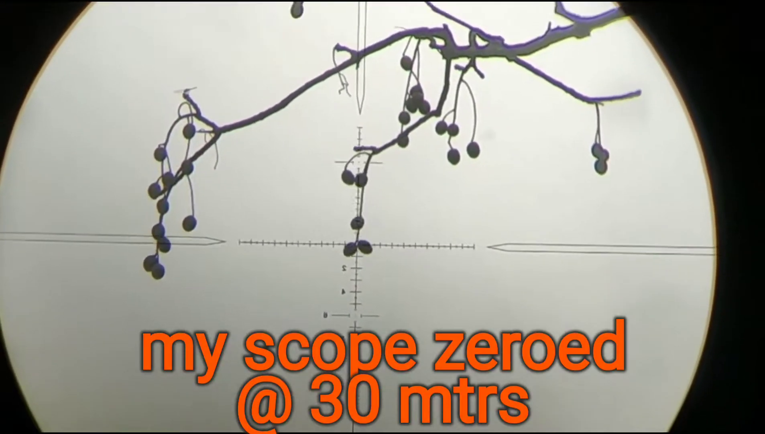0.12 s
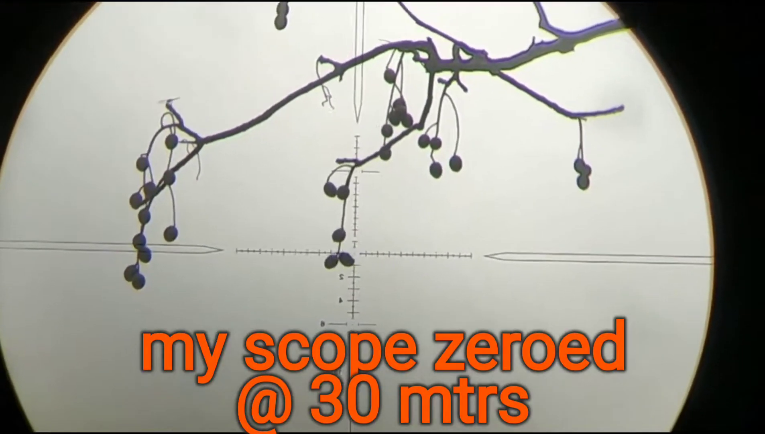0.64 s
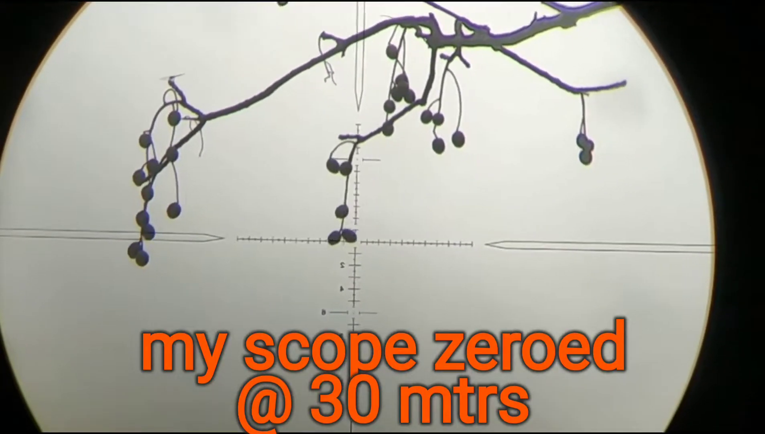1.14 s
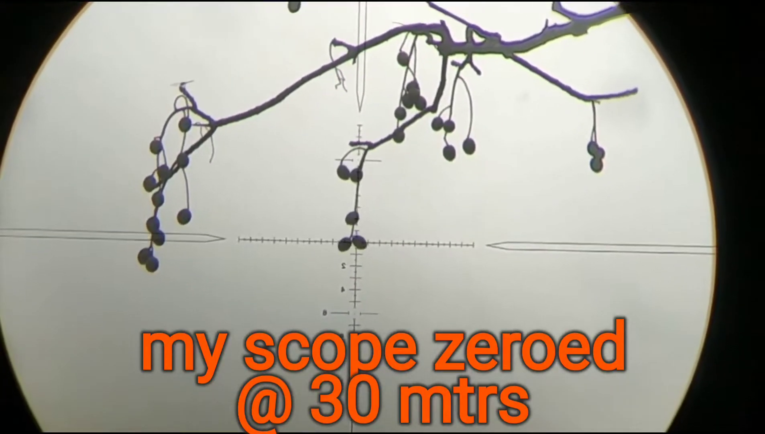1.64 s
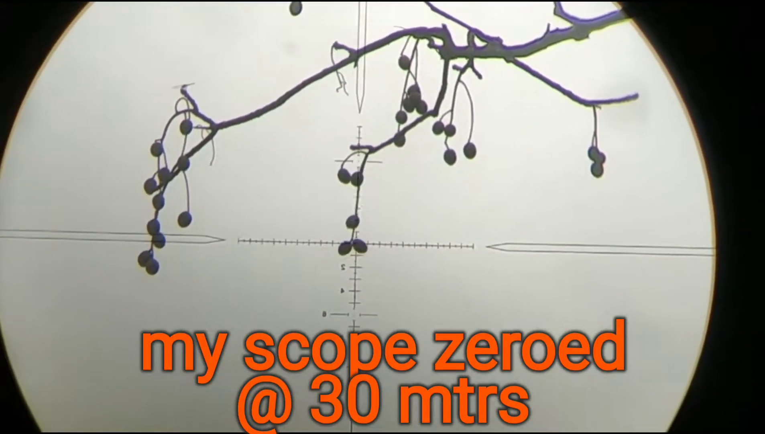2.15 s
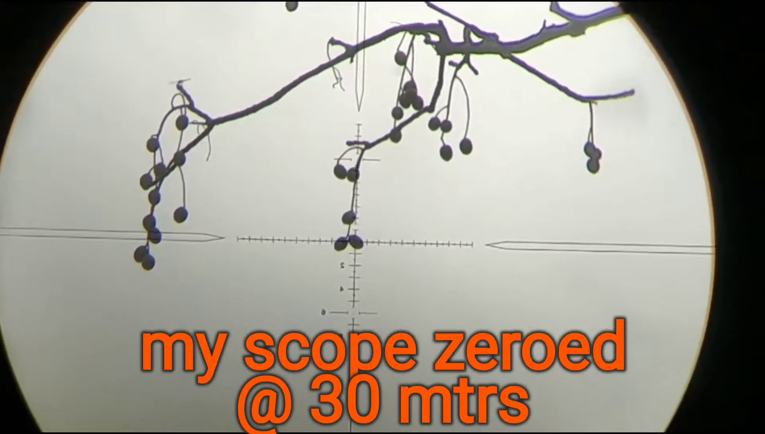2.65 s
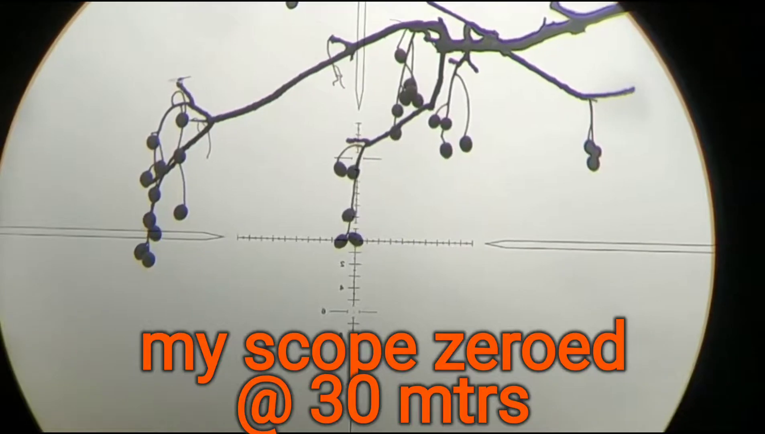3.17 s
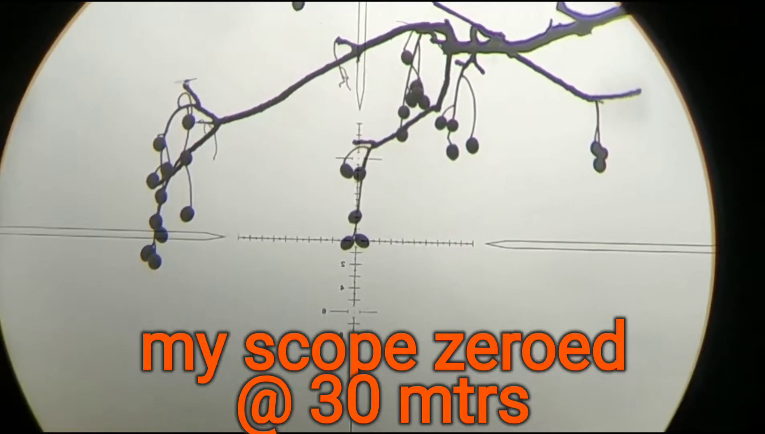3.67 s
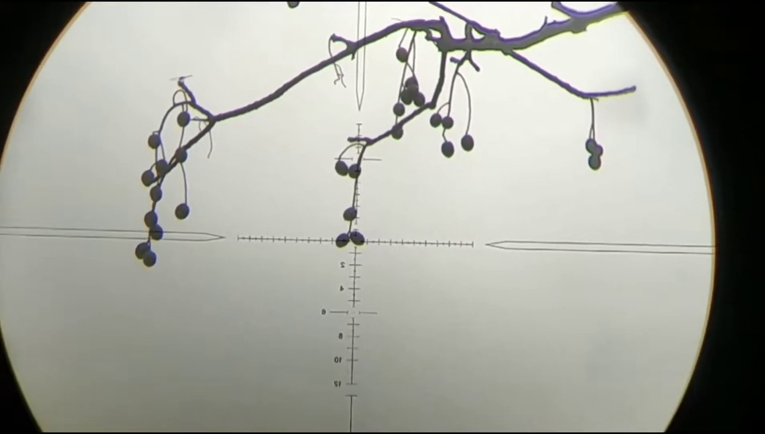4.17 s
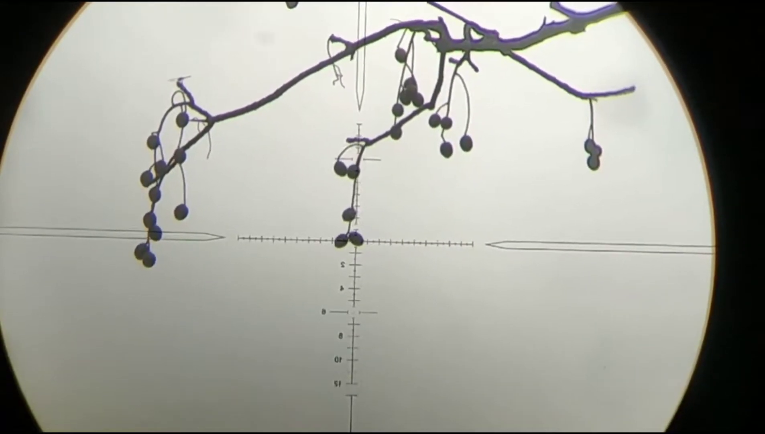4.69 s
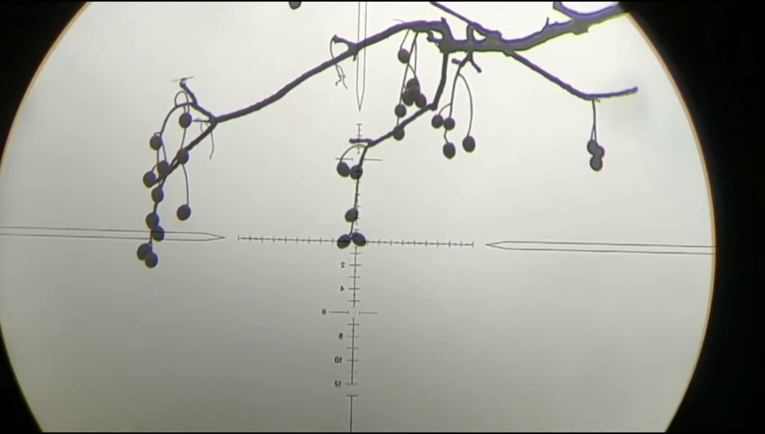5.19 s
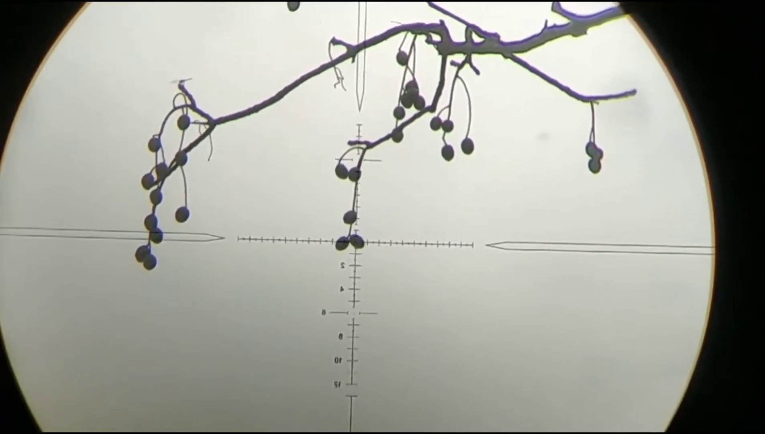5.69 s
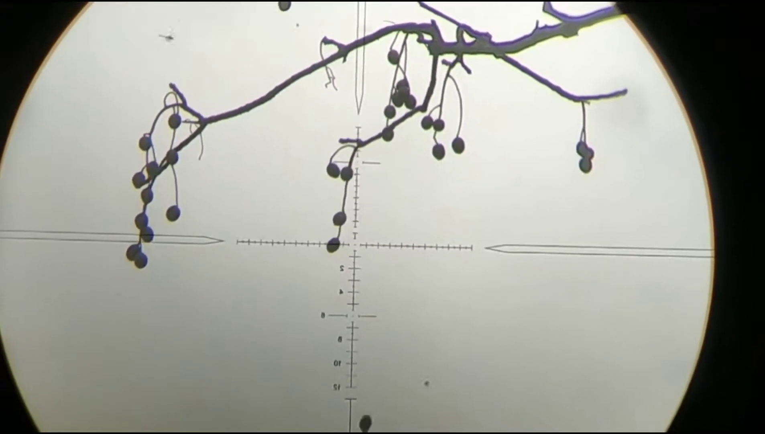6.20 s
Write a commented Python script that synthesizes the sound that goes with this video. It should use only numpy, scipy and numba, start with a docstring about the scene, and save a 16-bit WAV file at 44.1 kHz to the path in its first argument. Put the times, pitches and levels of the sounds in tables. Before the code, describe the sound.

Far-off engine putters, swells and fades in quiet open air; a low rumble cuts in, an air rifle snaps, and a twig cracks moments later.

```python
"""Outdoors: a distant single-cylinder engine, pulses and gas through a pipe, thumps up and away over a thin
hiss of air, which is coloured noise above dull far traffic; a short scratch of noise brushes once.
A centred rumble of noise and hums cuts in abruptly, then an air rifle fires just right of a two-port
microphone: damped clacks and thuds, noise for escaping air, ringing steel modes that it shakes.
A moment later the pellet cracks into a twig, and splinters and grainy echoes from the trees follow."""
import sys
import numpy as np
from scipy import signal
from scipy.fft import rfft, irfft
from scipy.io import wavfile
from scipy.ndimage import uniform_filter1d
from numba import njit

SR = 44100
rng = np.random.default_rng(int(sys.argv[2]) if len(sys.argv) > 2 else 0)


def bounce(signal):
    """Save signal as a 16-bit WAV file at the path given by the first command-line argument."""
    frames = np.transpose(np.atleast_2d(signal))
    limited = np.clip(frames, -1, 1)
    pcm = np.round(limited * 32767).astype(np.int16)
    wavfile.write(sys.argv[1], SR, pcm)


def natural_amplitude(level_db):
    """Convert a level in decibels to a linear amplitude factor, elementwise."""
    exponent = np.asarray(level_db, float) / 20
    return 10 ** exponent


N = 279064

# Colour of the two ports. Each row: frequency in Hz, left minus right in dB.
PORTS = [(60, 0.0), (110, 0.0), (200, 0.0), (380, 0.0), (700, 1.0), (1290, 1.5), (2380, 3.5), (4400, 0.0),
         (8120, 4.5), (15000, 0.0)]
LEFT_LAG_S = 21 / SR  # sound from the right reaches the left port this much later
PELLET_S = 6.2310  # the pellet strikes the twig


def unit(x):
    """Scale to rms 1."""
    return x / np.sqrt(np.mean(x ** 2))


def curve(table):
    """Columns of a time table, sample by sample."""
    s, *columns = np.transpose(table)
    return [np.interp(np.arange(N) / SR, s, c) for c in columns]


def bins_hz():
    """Frequencies of the Fourier bins."""
    return np.arange(N // 2 + 1) * SR / N


def over_hz(table):
    """A (Hz, value) table on the Fourier bins, along log frequency."""
    hz, value = np.transpose(table)
    return np.interp(np.log(bins_hz() + 1), np.log(hz), value)


def delay(seconds):
    """Phase turns that delay a spectrum; the delay may differ from bin to bin."""
    return np.exp(-2j * np.pi * bins_hz() * seconds)


def band(x, hz, width_hz):
    """Two-pole resonance, gain 1 at the centre."""
    return signal.lfilter(*signal.iirpeak(hz, hz / width_hz, SR), x)


@njit
def moving_band(x, hz, width_hz):
    """Band-pass whose centre moves sample by sample, gain 1 at the centre."""
    y, band_state, low_state = np.empty(len(x)), 0., 0.
    for i in range(len(x)):
        g, damping = np.tan(np.pi * hz[i] / SR), width_hz / hz[i]
        v = (band_state + g * (x[i] - low_state)) / (1 + g * (g + damping))
        band_state = 2 * v - band_state
        low_state = low_state + 2 * g * v
        y[i] = damping * v
    return y


def steady(x, seconds):
    """Even out slow swings of level; rms near 1."""
    k = int(seconds * SR)
    power = uniform_filter1d(uniform_filter1d(x ** 2, k), k)
    return x / np.sqrt(power + .05 * np.mean(x ** 2))


def walk(rate):
    """Random levels held 1 / rate s and slewed twice."""
    k = int(SR / rate)
    held = np.repeat(rng.standard_normal(N // k + 1), k)
    return uniform_filter1d(uniform_filter1d(held, k), k)[:N]


def noise(colour):
    """Coloured noise, rms 1."""
    return unit(irfft(rfft(rng.standard_normal(N)) * natural_amplitude(over_hz(colour)), N))


def swell(s, db, rise_s, hold_s, fall_s):
    """Gain of an envelope: exponential rise, hold, exponential fall."""
    t = np.arange(N) / SR - s
    return natural_amplitude(db - 60 * (np.clip(-t, 0, None) / rise_s + np.clip(t - hold_s, 0, None) / fall_s))


def ring(s, db, hz, t60, contact_s=1e-6):
    """A damped oscillation that starts at s and builds up while the contact lasts."""
    out, start = np.zeros(N), int(np.ceil(s * SR))
    t = np.arange(start, min(N, start + int(2 * t60 * SR))) / SR - s
    decay = np.exp(-np.log(1000) * t / t60)
    out[start:start + len(t)] = natural_amplitude(db) * np.clip(t / contact_s, 0, 1) * np.sin(2 * np.pi * hz * t) * decay
    return out


def panned_rings(rows, contact_s=1e-6):
    """Damped oscillations summed for left and right, the level difference split between them."""
    return np.array([sum(ring(s, db + way * pan / 2, hz, t60, contact_s) for s, db, hz, t60, pan in rows)
                     for way in (1, -1)])


def scatter(seconds, t60, grain_db, count):
    """Impulse responses of scattered echoes, uneven in strength, energy 1."""
    t = np.arange(int(seconds * SR)) / SR
    strength = natural_amplitude(grain_db * rng.standard_normal((count, len(t) // 40 + 1)))
    grain = np.repeat(strength, 40, axis=1)[:, :len(t)]
    tails = grain * rng.standard_normal((count, len(t))) * np.exp(-np.log(1000) * t / t60)
    return tails / np.sqrt(np.sum(tails ** 2, axis=1, keepdims=True))


def ports(right, left):
    """Sound from the right reaches the left port later, and each port has its own colour."""
    half_db = over_hz(PORTS) / 2
    return np.array([irfft(rfft(left) * delay(LEFT_LAG_S) * natural_amplitude(half_db), N),
                     irfft(rfft(right) * natural_amplitude(-half_db), N)])


def engine():
    """Each firing is a pulse and a burst of turbulent gas into the pipe; far walls fill the gaps between thumps."""
    # Each row: time in seconds, firing rate in Hz, level of the upper pipe modes in dB,
    # first pipe mode against the others in dB.
    drive = [(0.0, 12.3, -66, -19), (0.36, 12.9, -53, -15), (0.7, 14.7, -46, -16),
             (0.92, 13.45, -48.5, -15), (1.13, 12.4, -52, -11), (1.4, 13.3, -47.5, -13),
             (1.6, 14.7, -47, -5), (1.8, 15.6, -43, -11), (2.04, 16.2, -43, -8), (2.2, 15.9, -43.5, -5.5),
             (2.42, 15.05, -44.5, -8.5), (2.9, 16.55, -44, -9), (3.35, 14.4, -47.5, -7.5),
             (3.65, 13.8, -46.5, -9), (3.99, 13.1, -53.5, -9), (4.44, 11.6, -66.5, -7),
             (5.1, 11, -60.5, -6), (5.76, 11.3, -65, -10)]
    # Exhaust pipe at idle. Each row: mode in Hz, width in Hz before the widening below, level in dB,
    # gain of the wall echoes and of the gas against the direct pulse.
    pipe = [(82, 20, 0.5, 1.5, .4), (135, 20, -9, 1.3, .5), (168, 18, 1.5, 1.3, .3),
            (242, 24, -7.5, 1.8, .9), (332, 56, -12.5, 1.5, 1.0), (430, 50, -25, 1.8, 1.0)]
    idle_hz, pipe_rise_per_hz, widening = 12.53, .024, 1.4
    hz, db, low_db = curve(drive)
    turns = np.cumsum(hz) / SR + 0.62
    size = natural_amplitude(1.5 * rng.standard_normal(200))[turns.astype(int)]  # no two firings equally strong
    pulse = np.diff(np.floor(turns), prepend=0) * size
    # as the engine travels, one set of walls gives way to another
    near, far = (unit(signal.fftconvolve(pulse, tail)[:N]) for tail in scatter(.4, .35, 0, count=2))
    travel = 2 * np.pi * (.45 * np.arange(N) / SR + rng.random())
    walls = np.cos(travel) * near + np.sin(travel) * far
    gas = unit(size * np.exp(-(turns % 1) / 0.96) * rng.standard_normal(N))
    # hotter gas raises the modes as the engine speeds up
    heat = 1 + pipe_rise_per_hz * np.clip(hz - idle_hz, 0, None)
    modes = []
    for mode_hz, width_hz, mode_db, echo, rough in pipe:
        mode = unit(pulse) + echo * walls + rough * gas
        for _ in range(2):
            mode = moving_band(mode, mode_hz * heat, widening * width_hz)
        modes.append(natural_amplitude(mode_db) * steady(mode, .25))
    first, *upper = modes
    # the pipe radiates nothing below its first mode, whose share changes with the load
    first = signal.sosfilt(signal.butter(4, 68, "high", fs=SR, output="sos"), first)
    upper = unit(sum((-1) ** k * mode for k, mode in enumerate(upper)))
    sound = natural_amplitude(db) * (upper + natural_amplitude(low_db) * first)
    # coming from the left, it reaches that port a little earlier
    return np.array([sound, np.roll(sound, shift=9)])


def air():
    """Smooth outdoor hiss, less alike in the two ports the higher it is, over dull far traffic."""
    # Colour of the open air. Each row: frequency in Hz, relative level per Hz in dB.
    air_colour = [(260, -31), (450, -8), (600, -3), (950, 1.5), (1350, -5), (1700, -3), (2450, 0),
                  (3020, -3), (3500, -2.5), (4500, -4.5), (5700, -2), (7300, -12), (8500, -6), (10700, -20),
                  (13500, -21), (15600, -19.5)]
    # Each row: frequency in Hz, share of the hiss power common to both ports (0-1).
    likeness = [(400, 0.44), (900, 0.19), (2500, 0.1), (8000, 0.07)]
    # Colour of the far traffic. Each row: frequency in Hz, relative level per Hz in dB.
    traffic_colour = [(18, -50), (30, -26), (60, -21), (80, -9.5), (156, 1), (247, -6), (301, -11),
                      (455, -16), (500, -13.5), (650, -35.5), (1100, -120)]
    air_db, traffic_db = -57, -57
    share = np.clip(over_hz(likeness), 0, 1)
    common, left, right = (rfft(noise(air_colour)) for _ in range(3))
    # only the treble arrives from the side
    late = delay(LEFT_LAG_S * np.clip(bins_hz() / 400 - 1.6, 0, 1))
    tilt = natural_amplitude(over_hz(PORTS) / 2)
    left = tilt * (np.sqrt(share) * common * late + np.sqrt(1 - share) * left)
    right = (np.sqrt(share) * common + np.sqrt(1 - share) * right) / tilt
    pair = irfft(np.array([left, right]), N)
    drift_db = 0.19 * walk(2.0) + 0.66 * walk(25.0)
    hiss = natural_amplitude(air_db + drift_db) * pair / np.std(pair.mean(axis=0))
    # the traffic is almost centred
    traffic = noise(traffic_colour) + 0.12 * noise(traffic_colour) * np.array([[1], [-1]])
    return hiss + natural_amplitude(traffic_db) * traffic


def brush():
    """A short scratchy hiss, noise strongest where the microphone port resonates."""
    # Full at seconds, level in dB, rise of 60 dB in seconds, hold in seconds, fall of 60 dB in seconds.
    stroke = (.262, -44, .08, .035, .15)
    a, b = natural_amplitude(3.5 * walk(600)) * rng.standard_normal((2, N))
    hiss = []
    for x in (a, 0.3 * a + 1.7 * b):
        resonance = band(band(x, 5300, 2600), 5300, 2600)
        treble, middle, low = 0.11 * band(x, 7900, 1500), 0.8 * band(x, 3200, 3000), 0.3 * band(x, 1000, 900)
        hiss.append(unit(resonance + treble + middle + low + 0.02 * x))
    return swell(*stroke) * ports(*hiss)


def rumble():
    """Identical left and right: dull noise and unsteady hums switched on at once, with knocks and a later sag."""
    # Colour of the body. Each row: frequency in Hz, relative level per Hz in dB.
    body_colour = [(47, -29), (80, -0.5), (345, -11.5), (555, -9.5), (612, -12.5), (946, -14.5),
                   (1680, -22), (6690, -39), (9000, -36), (11700, -65), (19800, -120)]
    # Wavering hums. Each row: frequency in Hz, width of each of two filters in Hz, level in dB between swells,
    # exponent by which it follows the lowest hum's swell.
    hum_rows = [(122.5, 5.7, -57.5, .5), (189.9, 7.2, -60, 0.56), (466.5, 8.3, -57.5, 0.04),
                (568.5, 7.4, -58.5, 0.23), (700, 7.6, -60, 0), (930, 8, -75, 1.5), (6700, 220, -65.5, 0)]
    # Swells of the lowest hum. Each row: full at seconds, level in dB, rise of 60 dB in seconds,
    # hold in seconds, fall of 60 dB in seconds.
    swell_rows = [(5.893, -37.5, .6, .05, 0.3), (6.08, -47, 0.2, 0.0054, .2), (6.21, -43.5, 0.1, .12, .3)]
    # Dull knocks. Each row: start in seconds, level before decay in dB, frequency in Hz, 60 dB decay in seconds.
    knock_rows = [(5.7792, -34, 400, .01), (5.8509, -24, 500, .008), (5.8512, -26.5, 1200, .008),
                  (5.8880, -34, 800, .008), (5.9935, -34, 1350, .009)]
    # The pressure sags in slow throbs: start in seconds, scale in dB, throbs in Hz.
    start_s, sag_db, sag_hz = (6.22, -29, 31)
    rumble_start_s, knock_contact_s = 5.7792, .0003
    body_db, deep_hz, deep_rest_db = -42.5, 62.9, -54  # body; lowest hum and its level between swells
    t = np.arange(N) / SR
    body = natural_amplitude(body_db + 2.2 * walk(200)) * noise(body_colour)
    size = natural_amplitude(deep_rest_db) + sum(swell(*row) for row in swell_rows)
    deep = size * np.sin(2 * np.pi * np.cumsum(deep_hz + 2.39 * walk(12)) / SR)
    deep = deep + natural_amplitude(-51.5) * unit(band(rng.standard_normal(N), 31, 30))
    hums = 0
    for hz, width_hz, db, follow in hum_rows:
        hum = unit(band(band(rng.standard_normal(N), hz, width_hz), hz, width_hz))
        hums = hums + natural_amplitude(db) * (size / natural_amplitude(deep_rest_db)) ** follow * hum
    # flat troughs that recover briefly once a throb
    throb = np.cos(2 * np.pi * sag_hz * np.clip(t - start_s, 0, None))
    sag = natural_amplitude(sag_db) * (np.exp(1.9 * (throb - 1)) - 1)
    knocks = sum(ring(*knock, knock_contact_s) for knock in knock_rows)
    return (t >= rumble_start_s) * (body + deep + hums) + sag + knocks


def valve():
    """Gains of the air blast and of the lingering leak, both shut until the valve opens."""
    # A pop, a rush and a last sigh. Each row: full at seconds, level in dB before fluctuation and port shares,
    # rise of 60 dB in seconds, hold in seconds, fall of 60 dB in seconds.
    puffs = [(6.043, -16, .012, .0005, .012), (6.054, -20.5, .022, .016, .07), (6.085, -36, .05, .01, .16)]
    # Thin hiss that lingers, same columns: full at seconds, level in dB, rise, hold and fall in seconds.
    linger = (6.08, -42, .1, .01, 1.2)
    is_open = np.arange(N) / SR >= 6.0376
    blast = is_open * sum(swell(*puff) for puff in puffs) * natural_amplitude(2.5 * walk(300))
    leak = is_open * swell(*linger) * natural_amplitude(4.0 * walk(90))
    return blast, leak


def escaping_air(blast, leak):
    """Air leaving the barrel: turbulence as coloured noise, partly different at the left."""
    # Each row: frequency in Hz, relative level per Hz in dB.
    blast_colour = [(530, -47), (900, -13), (1800, -16), (2800, -8.5), (3500, -9), (3800, -20), (4100, -3),
                    (4700, -3), (5050, -19), (5400, -3), (6800, -6), (7500, -24), (8100, -7), (10000, -9),
                    (11300, -24), (12300, -14), (15600, -12)]
    # Each row: frequency in Hz, relative level per Hz in dB.
    leak_colour = [(900, -30), (2200, -10), (4000, -10), (5800, -2), (8200, -2.5), (11200, -9),
                   (15600, -12)]
    jet, side = (blast * noise(blast_colour) + leak * noise(leak_colour) for _ in range(2))
    return np.array([0.39 * jet + 0.85 * side, 0.84 * jet])


def steel(blast, leak):
    """The rushing air keeps shaking each mode of the action, which then dies at its own pace."""
    # Each row: frequency in Hz, peak level in dB, 60 dB decay in seconds.
    steel_modes = [(701, -33.5, 0.18), (4180, -31, 0.06), (4460, -31, .04), (5270, -35, .1),
                   (5640, -32, .12), (6220, -38, 0.1), (6810, -33, 0.12), (8270, -35, 0.14),
                   (9360, -32, 0.14), (9760, -29, .14), (10020, -35, 0.11), (10585, -38, 0.08),
                   (14360, -40, .1), (14580, -43, .12)]
    shake = (blast + leak) * rng.standard_normal(N)
    ringing = 0
    for hz, db, t60 in steel_modes:
        # loose parts touch and damp it fitfully
        mode = band(shake, hz, np.log(1000) / np.pi / t60) * natural_amplitude(5.0 * walk(70))
        ringing = ringing + natural_amplitude(db) * mode / np.abs(mode).max()
    return ringing


def clacks():
    """Metal parts of the mechanism strike: very short damped oscillations."""
    # Each row: start in seconds, level before decay in dB, frequency in Hz, 60 dB decay in seconds,
    # left minus right in dB before the colour of the ports.
    blows = [(6.0378, -40, 4500, 0.005, -3), (6.0402, -20, 6000, 0.007, -6), (6.0425, -9, 7100, 0.0024, -5),
             (6.04652, -5, 2600, 0.003, -4), (6.0468, -9, 1900, 0.0045, 2), (6.0467, -11, 4300, 0.004, 0),
             (6.0467, -14, 8800, 0.006, 2)]
    return panned_rings(blows, 1 / SR)


def thuds():
    """Low damped oscillations through the stock, reaching both ports at once."""
    # Each row: start in seconds, level before decay in dB, frequency in Hz, 60 dB decay in seconds,
    # left minus right in dB.
    thud_rows = [(6.0390, -36, 497, .02, 2), (6.0425, -14.5, 613, 0.024, 10.5),
                 (6.0443, -14, 1100, 0.0077, 3), (6.0456, -17, 1550, .007, 3),
                 (6.0452, -21.5, 357, 0.032, 0)]
    return panned_rings(thud_rows)


def twig():
    """The pellet's crack: all modes of the twig struck at once, then splinters snapping."""
    # Each row: level before build-up and decay in dB, frequency in Hz, 60 dB decay in seconds,
    # left minus right in dB before the colour of the ports.
    twig_modes = [(-2, 4100, 0.003, 0.5), (-3, 6200, 0.0026, -4), (-5, 8300, 0.0024, -3),
                  (-10, 2300, 0.003, -4), (-8, 3200, .0025, 0), (-12, 5100, .002, 0), (-13, 7300, .002, -3),
                  (-22, 10800, .003, 0), (-20, 15000, .004, 0)]
    # Each row: start in seconds, then the columns of the twig: dB, Hz, seconds, dB.
    splinters = [(6.2350, -17, 4500, .005, 0), (6.2365, -21, 2500, .008, 0), (6.2375, -20, 8000, .007, 0),
                 (6.2385, -23, 6000, .008, 0), (6.2425, -19, 3100, .006, 0)]
    contact_s = .0005
    return panned_rings([(PELLET_S, *mode) for mode in twig_modes] + list(splinters), contact_s)


def echoes(clack):
    """Grainy echoes from the trees, a different scatter for each port, after the shot and after the crack."""
    # Colour after the crack. Each row: frequency in Hz, relative level per Hz in dB.
    crack_colour = [(1200, -27), (2300, 3), (3600, 3), (5200, -4), (6100, 2), (7200, -6), (8500, 1),
                    (10500, -16), (13000, -28), (15600, -18)]
    shot_db, crack_db, echo_t60_s = -14, 3, 0.3
    bright = signal.sosfilt(signal.butter(2, 1500, "high", fs=SR, output="sos"), clack)
    before = np.arange(N) < PELLET_S * SR
    crack = irfft(natural_amplitude(over_hz(crack_colour)) * delay(PELLET_S + .002), N)  # a coloured impulse
    source = natural_amplitude(shot_db) * before * bright + natural_amplitude(crack_db) * crack
    right, left = (signal.fftconvolve(source, tail)[:N] for tail in scatter(0.57, echo_t60_s, 4.0, count=2))
    return np.array([left, right])


def rifle():
    """The shot and its strike, heard through the ports; the thuds bypass their lag and colour."""
    blast, leak = valve()
    clack = clacks()
    left, right = clack + escaping_air(blast, leak) + steel(blast, leak) + twig() + echoes(clack[1])
    return ports(right, left) + thuds()


def scene():
    """All sources at the two ports."""
    return engine() + air() + brush() + rumble() + rifle()


def top_cut(x):
    """Nothing passes above the cut-off."""
    return signal.sosfilt(signal.butter(12, 16480, fs=SR, output="sos"), x)


def record(dry):
    """A steep low-pass cuts off the top of the finished mix."""
    mix = signal.sosfilt(signal.ellip(8, .3, 45, 15620, fs=SR, output="sos"), dry)
    return top_cut(mix)


dry = scene()
out = record(dry)
bounce(out)
```